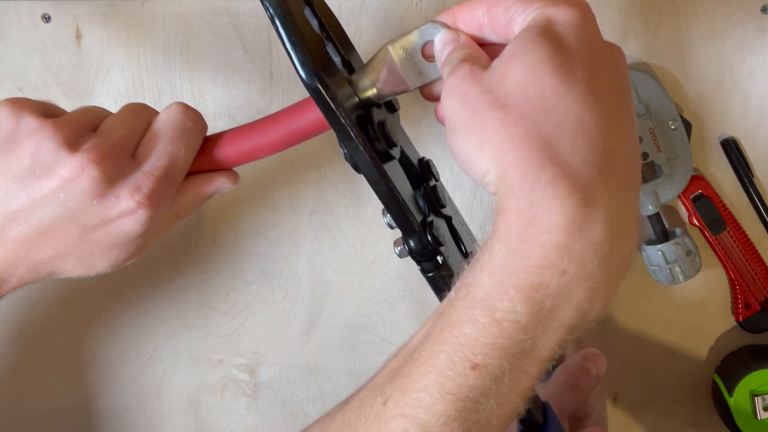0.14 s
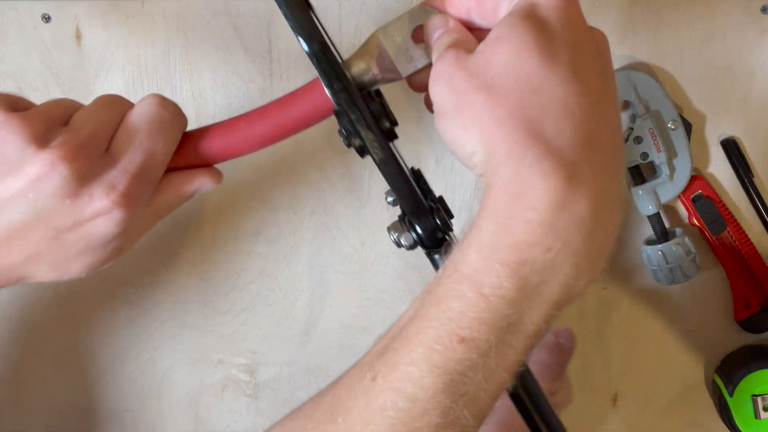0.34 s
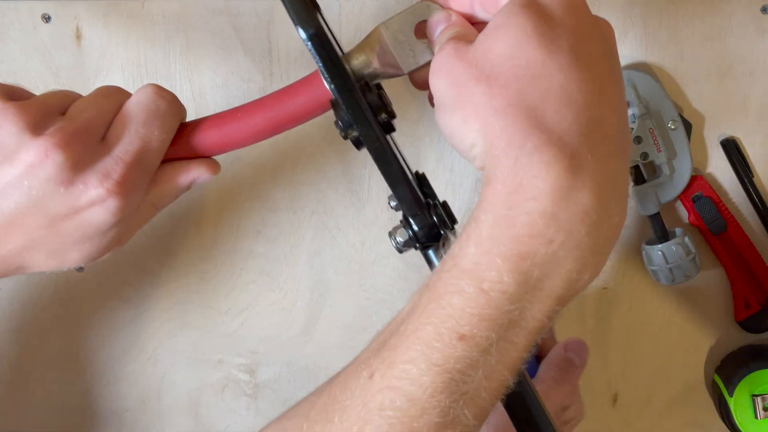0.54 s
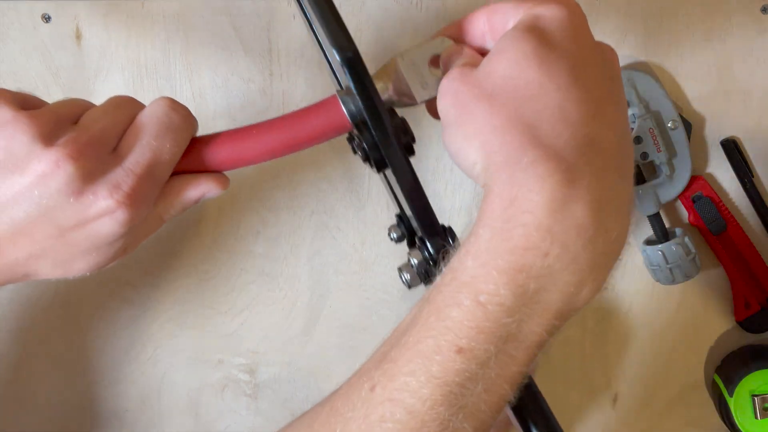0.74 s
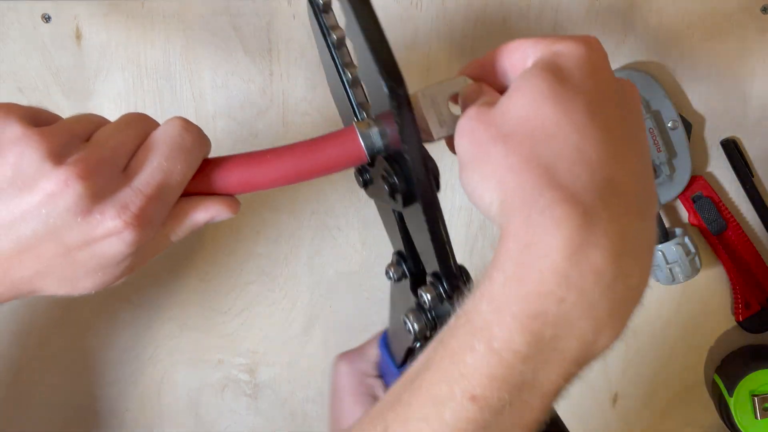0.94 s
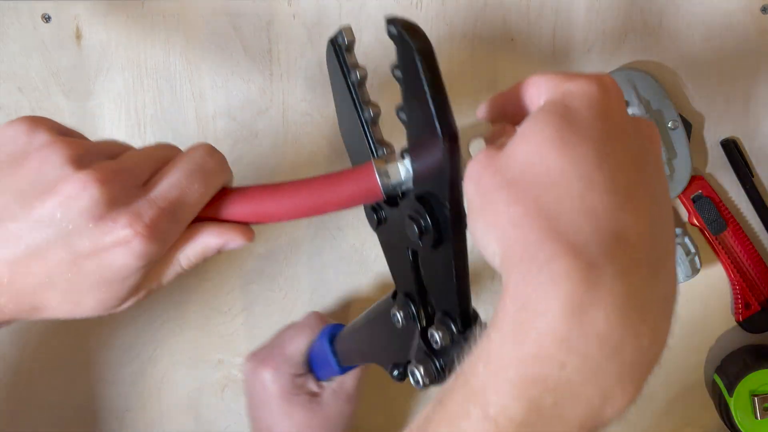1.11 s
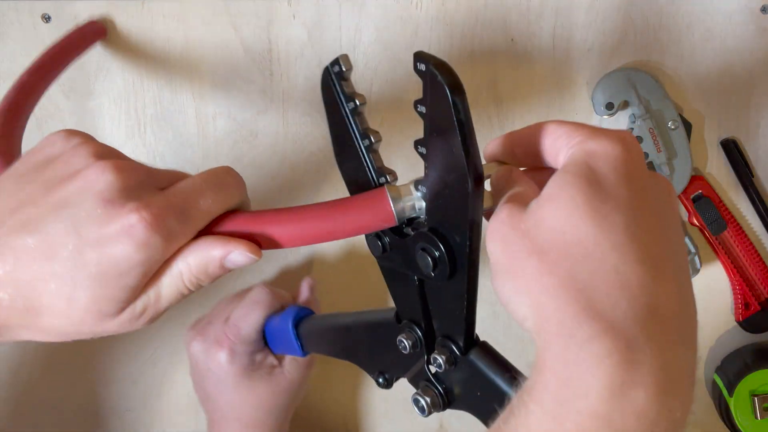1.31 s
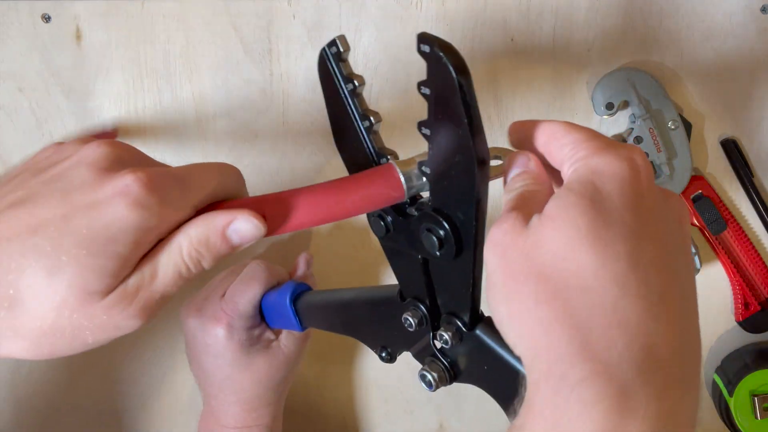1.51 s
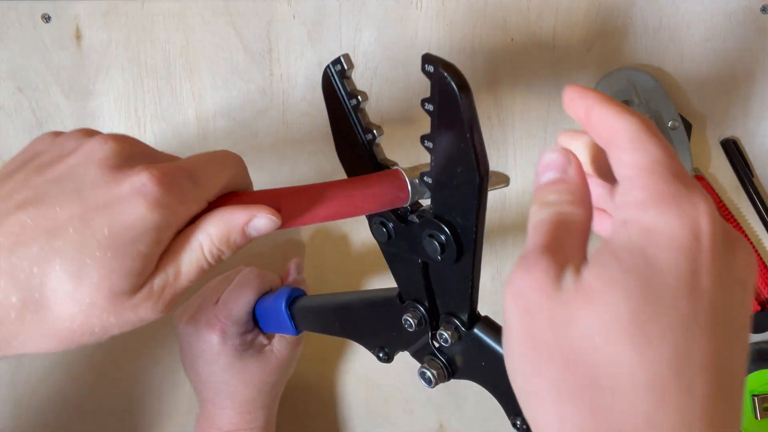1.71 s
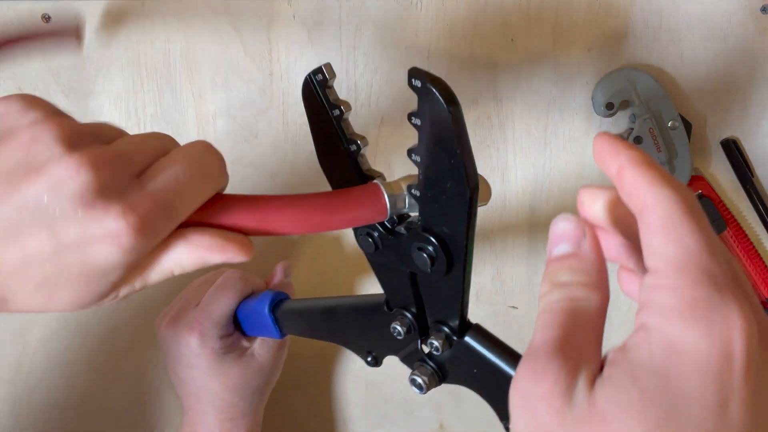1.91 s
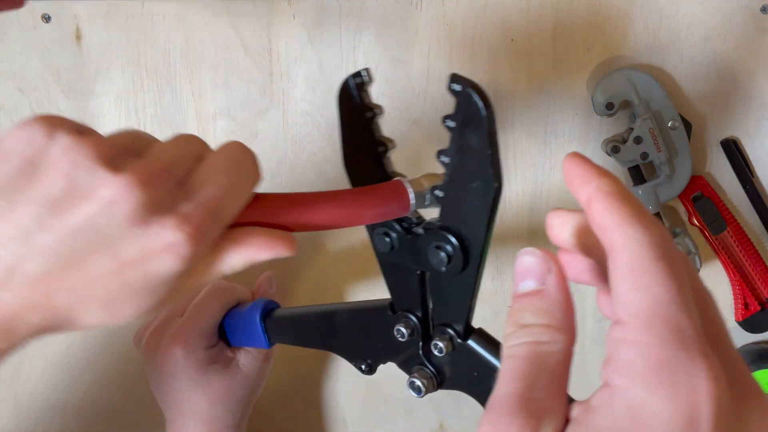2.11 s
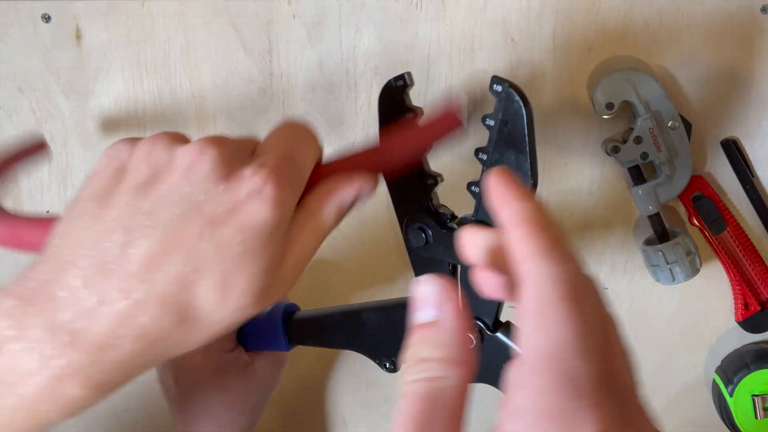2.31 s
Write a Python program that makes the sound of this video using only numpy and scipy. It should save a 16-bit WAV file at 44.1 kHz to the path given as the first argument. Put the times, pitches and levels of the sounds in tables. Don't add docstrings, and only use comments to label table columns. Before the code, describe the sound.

Three irregular, boomy knocks of a long steel tool on wood, with brief rattles, soft handling bumps and gritty cable drag between them, finishing with a bright metallic clack, heard closely in a small quiet room.

```python
import sys
import numpy as np
from scipy import signal
from scipy.fft import rfft, irfft
from scipy.io import wavfile
from scipy.ndimage import uniform_filter1d

SR = 44100
rng = np.random.default_rng(int(sys.argv[2]) if len(sys.argv) > 2 else 0)


def volts(x):
    e = np.asarray(x, float) / 20
    return 10 ** e


def dump_mix(stems):
    frames = np.atleast_2d(stems).T
    limited = np.clip(frames, -1, 1)
    pcm = np.round(limited * 32767).astype(np.int16)
    wavfile.write(sys.argv[1], SR, pcm)


N = 103635

PORTS = np.array([[.5], [-.5]])
CLICK_TURN_RAD = 1.62


def blows():
    # (time [s], ring level [dB], push length [ms], travel at 100 Hz [ms],
    # first wave level [dB])
    contacts_a = [
        (.2145, 2.5, 1.334, 15, -1),
        (.230, -9, 3.5, 10.4, -8),
        (.256, -17.5, 3.5, 15, -14),
    ]
    contacts_b = [
        (1.2505, -11.5, 1.44, 10.96, -42),
        (1.2595, -4.5, 3.85, 10.86, -28),
        (1.2685, -29, 6.6, 10.4, -28),
    ]
    contacts_c = [
        (1.940, -17.5, 1.65, 16.98, -38),
        (1.947, -11.5, 2.27, 17.54, -4),
    ]
    # (frequency [Hz], level [dB], time to fade 60 dB [s])
    modes_a = [(70.4, -17, 0.67), (131, -15.5, 0.45), (175, -23.5, 0.34), (105.7, -8, 0.12),
               (402, -24.5, 0.1098), (418.5, 1, 0.06), (511.6, -3.5, 0.08), (720, 7, 0.028),
               (822, -0.5, 0.09), (1052, -14.5, 0.054), (1127.5, -1.5, 0.1), (1560, -24, .05),
               (1670, -20.5, .03)]
    modes_b = [(70.63, -19, 0.65), (115, 3, 0.087), (106.8, -13, 0.33), (131, -23, 0.46), (185.5, -9, 0.29),
               (219.3, -23.5, 0.26), (356, -3.5, 0.038), (497, -18, 0.14), (634, -4.5, 0.031),
               (922, -5, 0.08)]
    modes_c = [(70.3, -15, 0.65), (102.5, -7, 0.14), (152, -20, 0.42), (187.8, 3, 0.18), (257, -7.5, 0.18),
               (299.6, 2, 0.14), (395, -14, 0.22), (500, -3, 0.11), (570, -4.5, 0.035), (745.5, 2.5, 0.071),
               (1074, -7.5, .06)]
    first = bench(contacts_a, modes_a, (0.31, 1.51, -19.5))
    second = bench(contacts_b, modes_b, (2.1, 2.2, 0.9))
    third = bench(contacts_c, modes_c, (.4, 2.42, -14))
    return first + second + third


def bumps():
    # (time [s], level [dB], push length [ms])
    touches = [(.005, -71, 7.4), (0.108, -49.5, 0.92), (0.191, -48, 1), (0.603, -41, 1.97),
               (0.688, -43, 2.4), (0.719, -35.5, 5.6), (.975, -43.5, 4.2), (1.048, -34, 9.3),
               (1.075, -31, 4.3), (2.134, -50.5, 2.25), (1.92, -35, 2.4), (1.932, -38.5, 3.5),
               (2.267, -61, 1.9)]
    # (frequency [Hz], level [dB], time to fade 60 dB [s])
    soft_modes = [(74.6, 6.5, 0.17), (115, 0, 0.41), (180, -11.5, 1), (329.1, -1, 0.041), (533, -7, .1),
                  (800, -22, .06)]
    contacts = [(s, db, push_ms, 8, db - 1.0) for s, db, push_ms in touches]
    return bench(contacts, soft_modes, (.1, 0.46, -11))


def bench(contacts, modes, side):
    t = np.arange(1, int(.8 * SR)) / SR
    out = np.zeros((2, N))
    luck = rng.standard_normal((len(modes), 3))
    for s, ring_db, push_ms, travel_ms, wave_db in contacts:
        bend = 100 * (travel_ms / 1000) ** 2
        x = bending_wave(t, bend, push_ms, wave_db, side)
        for mode, chance in zip(modes, luck):
            ring = bench_mode(t, bend, push_ms, ring_db, mode, chance, side)
            x[:, :ring.shape[1]] += ring
        x += bench_blur(t, push_ms, travel_ms, wave_db + side[2])
        add(out, x, s)
    return out


def softness(hz, push_ms):
    return 1 / (1 + (hz * push_ms / 1000) ** 2) ** 2


def bending_wave(t, bend, push_ms, wave_db, side):
    pan_db, turn_rad, _ = side
    hz = np.minimum(bend / t ** 2, SR / 4)
    level = volts(wave_db + PORTS * pan_db) * softness(hz, push_ms) ** 2
    bass_limit = np.exp(-(69.4 / hz) ** 2)
    gap = PORTS * turn_rad * np.tanh(hz / 500)
    return level * bass_limit * np.sin(2 * np.pi * bend / t + gap)


def bench_mode(t, bend, push_ms, ring_db, mode, chance, side):
    mode_pan_db, twin_spread, twin_db = -1.5, 0.08, -2
    hz, db, t60 = mode
    pan, turn, twin = chance
    length = int(min(t60, .75) * SR) + 2000
    u = np.maximum(t[:length] - np.sqrt(bend / hz), 0)
    gap = PORTS * (side[1] + 0.1 * turn) * np.tanh(hz / 500)
    shape = softness(hz, push_ms) * (1 - np.exp(-u * hz * 1.1)) * decay(u, t60)
    turns = 2 * np.pi * hz * u
    tone = np.sin(turns + gap)
    twin_ratio = 1 + twin_spread * np.tanh(3 * twin)
    tone = tone + volts(twin_db - 25 * u / t60) * np.sin(turns * twin_ratio - gap)
    return volts(ring_db + db + PORTS * (side[0] + mode_pan_db * pan)) * shape * tone


def bench_blur(t, push_ms, travel_ms, level_db):
    late = np.maximum(t - travel_ms / 2000, 0)
    noise = wide(.7)[:, :len(t)]
    dull = band(band(noise, 487 / np.sqrt(push_ms), 500), 410, 810)
    return volts(level_db) * (1 - np.exp(-late / 0.0026)) * decay(late, 0.11) * dull


def clicks():
    # (time [s], peak level [dB], tone [Hz], left-right level [dB], time to fade 60 dB [s])
    hits = [(.197, -43, 3940, 2.5, 0.045), (0.2196, -58, 1500, -8, 0.082), (0.22, -46, 3100, -1, 0.21),
            (.385, -54.5, 1900, 1, 0.03), (0.437, -57, 2240, 0.5, 0.099), (0.8901, -51, 3500, 2, 0.023),
            (.9796, -53, 3460, 3, .06), (1.075, -59, 1500, 0, 0.026), (1.253, -47.5, 1930, -2, 0.088),
            (1.2586, -45.5, 3340, 3.5, 0.1), (1.2782, -46, 2840, 14, 0.05), (1.8266, -36, 1470, 0.5, 0.021),
            (1.8276, -44.5, 5550, 6, 0.017), (1.828, -48, 2590, 0.5, .12), (1.923, -51, 790, -1, 0.072),
            (1.9459, -21, 8900, 1, 0.019), (1.948, -36, 4200, 4.5, 0.075), (1.964, -28, 2150, 0, 0.035),
            (1.965, -28.5, 6430, -2, 0.023), (2.2596, -49, 1580, 3, 0.04), (2.2635, -59.5, 2630, 1, 0.087),
            (2.3032, -24, 4400, -6, 0.0089), (2.3043, -23, 1050, 3.5, 0.02)]
    # (frequency [Hz], level [dB], time to fade 60 dB [s])
    steel_modes = [(630, -8.5, 0.13), (1050, -10, .06), (1500, -9, .06), (2303, -4.5, 0.12),
                   (2960, -4.5, 0.11), (4400, -21.5, 0.032), (6600, -15.5, 0.066), (8600, -24, .03)]
    # (frequency [Hz], level [dB])
    crack_air = [(500, -12.5), (1000, 3.5), (2500, -1.5), (6000, -9), (7700, -18), (10500, -20),
                 (12700, -36.5), (14800, -20), (16300, -41)]
    steel_db, steel_shorten, crack_db, tint = -1.5, 0.15, -6, 4.2
    u = np.arange(8192) / SR
    out = np.zeros((2, N))
    for s, db, hz, pan_db, t60 in hits:
        noise = colour(rng.standard_normal(len(u)), crack_air)
        tinted = band(band(noise, hz, hz / 3), hz, hz / 3)
        snap = 1 + 2.0 * np.exp(-u / 0.00098)
        crack = (noise * snap + tint * tinted) * decay(u, t60)
        ring = np.zeros(len(u))
        for f, mode_db, mode_t60 in steel_modes:
            chance = rng.standard_normal()
            near_db = -3.7 * abs(np.log2(f / hz))
            tone = np.sin(2 * np.pi * f * (1 + chance / 100) * u)
            ring += volts(mode_db + 3.8 * chance + near_db) * decay(u, steel_shorten * mode_t60) * tone
        both = (1 - np.exp(-u / 0.0011)) * (volts(crack_db) * crack + volts(steel_db) * ring)
        add(out, pair(volts(db) * both, pan_db, CLICK_TURN_RAD), s)
    return out


def rattles():
    # (start [s], length [s], level [dB])
    chatter = [
        (.228, 0.013, -50),
        (.24, 0.032, -39.5),
        (.27, 0.0091, -63),
        (1.256, 0.042, -48.5),
        (1.29, 0.095, -68),
        (1.964, 0.013, -43),
        (2.308, 0.085, -57.5),
    ]
    loose_tones = [2820, 4200, 5880, 10400]
    # (frequency [Hz], level [dB])
    loose_air = [(500, -20.5), (1200, -3.5), (2800, -7.5), (6000, -13), (8000, -12), (10800, -19),
                 (12700, -44.5), (14800, -23), (16300, -43.5)]
    grains = wide(-0.012) * volts(7.3 * walk(300))
    ringing = sum(7.5 * band(grains, hz, hz / 9) for hz in loose_tones)
    return strokes(chatter, index=2) * colour(grains + ringing, loose_air)


def pings():
    # (time [s], level [dB], frequency [Hz], time to fade 60 dB [s])
    nudges = [(.112, -39, 194, 0.081), (.191, -51.5, 1013, 0.18), (0.617, -41, 231, 0.16),
              (0.63, -65, 317, 0.09), (1.252, -50.5, 1430, 0.13), (1.255, -57, 1990, .05),
              (1.826, -55, 590, 0.054), (1.919, -36, 754, 0.057), (1.963, -54, 2200, 0.11),
              (1.964, -55, 1380, .05), (2.258, -45, 680, .04), (2.258, -49, 1251, .05),
              (2.294, -48, 3010, 0.18), (2.302, -29.5, 3030, 0.065), (2.304, -39, 1223, .035),
              (2.307, -41, 620, 0.091), (2.312, -57.5, 2630, 0.17), (2.335, -46, 720, 0.14)]
    rise_cycles, pan_db, rough_db, pitch_wobble = 2.5, -0.5, 6, 0.03
    u = np.arange(8192) / SR
    out = np.zeros((2, N))
    flutter, wobble = walk(180), walk(140)
    for s, db, hz, t60 in nudges:
        at = np.minimum(int(s * SR) + np.arange(len(u)), N - 1)
        turns = 2 * np.pi * hz * np.cumsum(1 + pitch_wobble * wobble[at]) / SR
        ring = (1 - np.exp(-u * hz / rise_cycles)) * decay(u, t60) * np.sin(turns)
        rough = volts(db + rough_db * flutter[at]) * ring
        add(out, pair(rough, pan_db, CLICK_TURN_RAD * np.tanh(hz / 500)), s)
    return out


def rubbing():
    # (start [s], length [s], hiss level [dB], bench rumble level [dB])
    slides = [(.03, 0.14, -71.5, -56), (.17, 0.13, -59, -45), (.29, 0.13, -63, -42.5),
              (.39, 0.18, -64.5, -46), (.58, 0.15, -71, -41.5), (.7, 0.1, -70, -51),
              (.78, 0.189, -69.5, -52), (.96, 0.077, -65, -49), (1.02, 0.12, -66.5, -46.5)]
    # (frequency [Hz], level [dB])
    rub_air = [(1650, -20), (2800, -13), (5520, -11), (7440, -18.5), (10600, -12.5), (12000, -21),
               (12600, -34), (13800, -18.5), (16000, -38)]
    # (frequency [Hz], level [dB])
    rub_wood = [(18, -39.5), (30, -34.5), (75, -0.5), (170, -4), (256, -22), (322, -12.5), (418, -29.5),
                (526, -20), (1500, -71), (1950, -74), (3300, -120)]
    hiss = strokes(slides, index=2) * colour(wide(.1) * volts(2 * walk(200)), rub_air)
    rumble = strokes(slides, index=3) * colour(wide(0.62), rub_wood)
    return hiss + rumble


def cable_drag():
    # (time [s], level [dB])
    drag_level = [
        (.3, -79),
        (.385, -71),
        (.45, -64),
        (.55, -68.5),
        (.62, -69),
        (.68, -82),
    ]
    # (frequency [Hz], width [Hz], level [dB])
    jacket = [(700, 230, 5), (1845, 184, 3), (2200, 120, 3), (5480, 500, -11)]
    grit = wide(0.073) * volts(3.2 * walk(89.54))
    t = np.arange(N) / SR
    inside = (t > drag_level[0][0]) & (t < drag_level[-1][0])
    body = sum(volts(db) * band(band(grit, hz, width), hz, width) for hz, width, db in jacket)
    return 8 * inside * volts(curve(drag_level)) * body


def room(x):
    low_t60, top_t60, room_db = 0.26, 0.06, -9
    u = np.arange(int(.6 * SR)) / SR
    noise = rng.standard_normal((2, len(u)))
    low = signal.lfilter([.2], [1, -.8], noise)
    tail = low * decay(u, low_t60) + (noise - low) * decay(u, top_t60)
    tail = tail * (u > .006) / np.sqrt(np.sum(tail ** 2) / 2)
    return volts(room_db) * signal.fftconvolve(x, tail, axes=1)[:, :N]


def quiet_floor():
    # (frequency [Hz], level [dB])
    floor_air = [(15, -9), (25, 6.5), (134, 3), (229, -12), (309, -5.5), (450, -15.5), (962, -26),
                 (1400, -32), (10500, -42), (12500, -47), (16000, -61)]
    return volts(-59.5 + 1.5 * walk(9.6)) * colour(wide(0.25), floor_air)


def decay(u, t60):
    return np.exp(-np.log(1000) * u / t60)


def colour(x, points):
    p, n = np.array(points, float), x.shape[-1]
    log_hz = np.log(np.fft.rfftfreq(n, 1 / SR) + 1)
    gain = volts(np.interp(log_hz, np.log(p[:, 0]), p[:, 1], left=-70, right=-70))
    y = irfft(rfft(x) * gain, n)
    return y / np.sqrt(np.mean(y ** 2))


def band(x, hz, width):
    return signal.lfilter(*signal.iirpeak(hz, hz / width, fs=SR), x)


def walk(rate):
    k = int(SR / rate)
    steps = np.repeat(rng.standard_normal(N // k + 1), k)
    return 0.64 * uniform_filter1d(uniform_filter1d(steps, k), k)[:N]


def curve(points, index=1):
    p = np.array(points, float)
    return np.interp(np.arange(N) / SR, p[:, 0], p[:, index])


def strokes(rows, index):
    t = np.arange(N) / SR
    total = np.zeros(N)
    for row in rows:
        progress = np.clip((t - row[0]) / row[1], 0, 1)
        total += volts(row[index]) * np.abs(np.sin(np.pi * progress)) ** 0.92
    return total


def pair(x, pan_db, turn_rad):
    turned = signal.hilbert(x) * np.exp(-1j * PORTS * turn_rad)
    return volts(PORTS * pan_db) * turned.real


def wide(likeness):
    mid, side = rng.standard_normal((2, N))
    c = np.clip(likeness, -1, 1)
    return np.sqrt(1 + c) * mid + np.sqrt(1 - c) * side * np.array([[1], [-1]])


def add(out, x, s):
    i = int(s * SR)
    out[:, i:i + x.shape[1]] += x[:, :max(N - i, 0)]


def scene():
    wood = blows() + bumps()
    steel = clicks() + rattles() + pings()
    rubs = rubbing() + cable_drag()
    return wood + steel + rubs + room(steel + volts(-5.5) * wood) + quiet_floor()


def roll_off(x):
    return signal.sosfilt(signal.butter(12, 16620, fs=SR, output="sos"), x)


def record(dry):
    mic_low_hz, mic_gain_db, ceiling = 51, -1, .95
    low_cut = signal.sosfilt(signal.butter(4, mic_low_hz, "high", fs=SR, output="sos"), dry)
    mix = ceiling * np.tanh(volts(mic_gain_db) * low_cut / ceiling)
    return roll_off(mix)


dry = scene()
out = record(dry)
dump_mix(out)
```